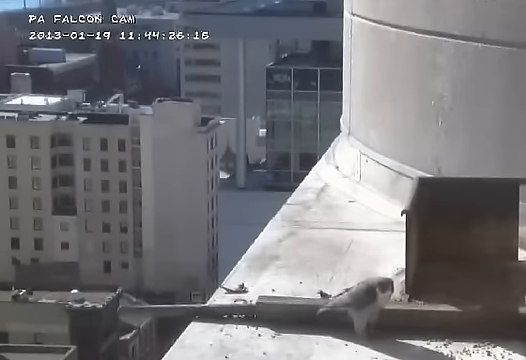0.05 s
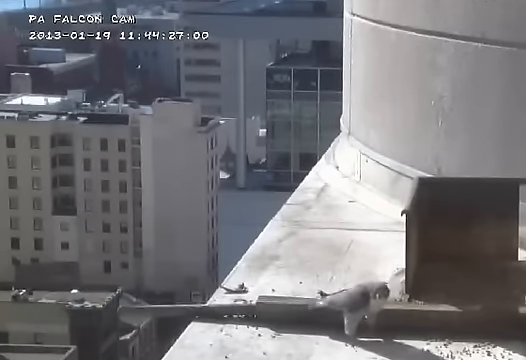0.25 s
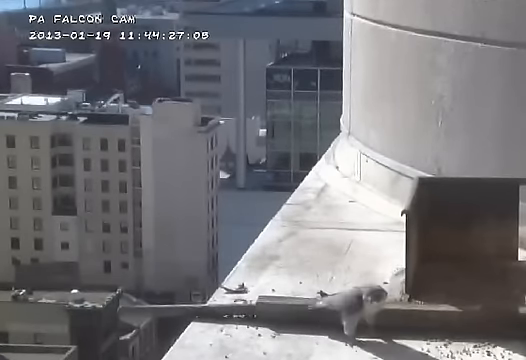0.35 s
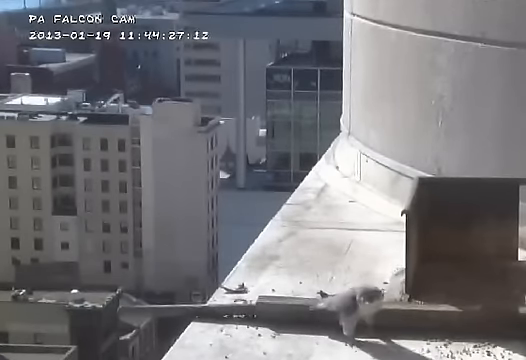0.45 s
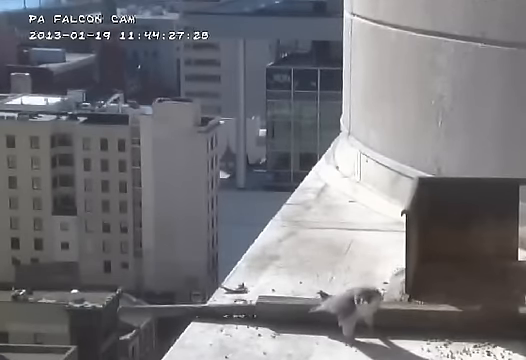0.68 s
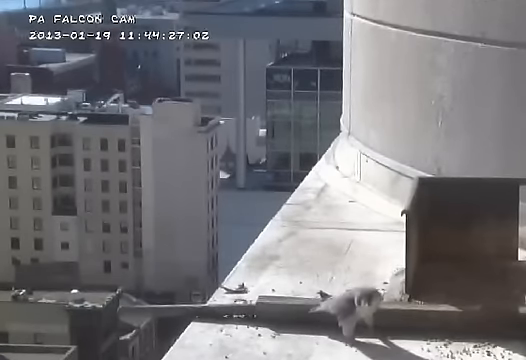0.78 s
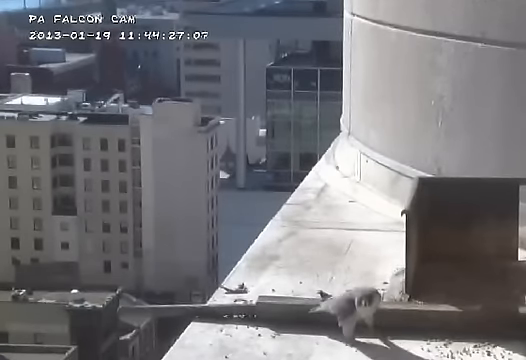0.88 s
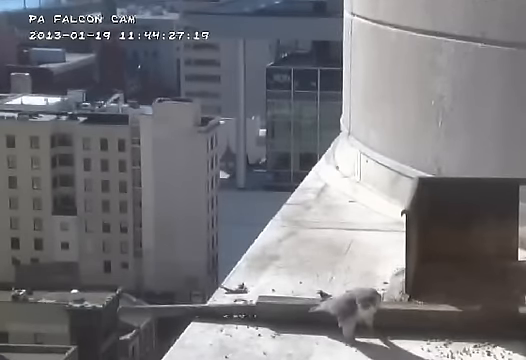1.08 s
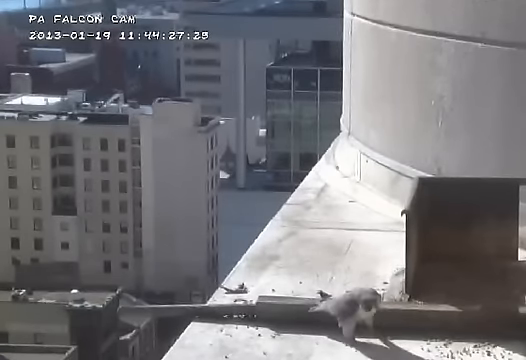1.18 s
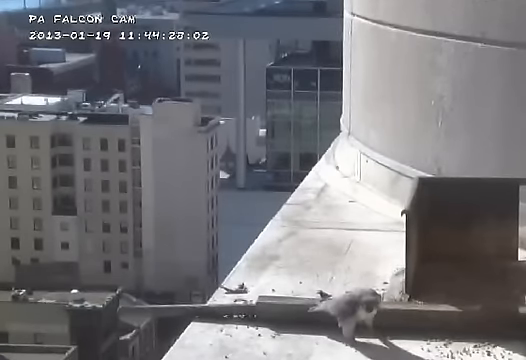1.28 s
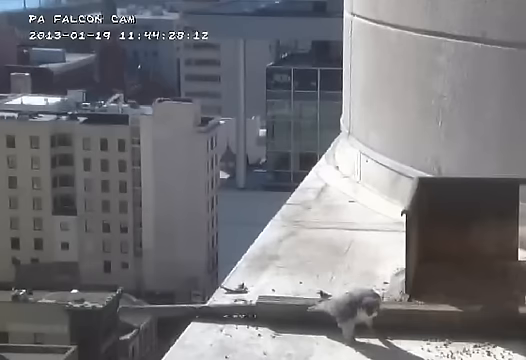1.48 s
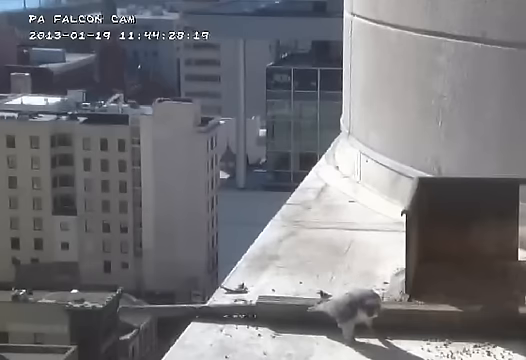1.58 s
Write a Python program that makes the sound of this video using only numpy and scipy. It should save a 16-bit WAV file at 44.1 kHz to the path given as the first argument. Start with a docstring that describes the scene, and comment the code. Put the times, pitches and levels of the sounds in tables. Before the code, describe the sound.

A falcon calls three times, close to the microphone on a high stone city ledge. Each short harsh call is a rising whistle breaking into a raspy chup. Faint traffic, ventilation hum and low wind lie underneath.

```python
"""A high stone ledge in the city, the microphone near a falcon that gives three harsh "ee-chup" calls.
Each is a thin lead-in, a rising whistle, then a break of the voice into a yelp and a bark,
ending in a rasp and a hollow chuff. The stonework close by throws the calls back;
distant traffic, ventilation hum and low wind lie underneath."""
import sys
import numpy as np
from scipy import signal
from scipy.fft import rfft, irfft
from scipy.io import wavfile

SR = 44100
rng = np.random.default_rng(int(sys.argv[2]) if len(sys.argv) > 2 else 0)


def file_out(sig):
    """Save sig as 16-bit WAV at sys.argv[1]."""
    # one column per channel
    cols = np.atleast_2d(sig).T
    # limit, then scale
    lim = np.clip(cols, -1, 1)
    pcm = np.round(lim * 32767).astype(np.int16)
    wavfile.write(sys.argv[1], SR, pcm)


N = 72765
TIME = np.arange(N) / SR
LEAD_HZ, LEAD_RISE_HZ = 1897.5, 186.6
WHISTLE_AHEAD_S = .062  # from the start of the full whistle to the break of the voice


def falcon():
    """Three calls, each timed around the break of the voice; returns the voiced and the rough parts."""
    # One row a call: break_s, lead_db, whistle_db, yelp_db, bark_db, rasp_db, chuff_db, whistle_hz,
    # bark_hz, bark_length_s, rasp_delay_s, chuff_delay_s, hoarse_db, rasp_hiss_db,
    # bark_fundamental_db, bark_third_harmonic_db
    calls = [ (0.309, -25.5, -22.5, -11, -15, -24, -35.5, 3325, 1883, .009, 0.015, 0.03, -22.5, -3, -20, -17),
             (0.7318, -28, -28.5, -16, -20, -26, -37, 3320, 1854, 0.022, 0.014, 0.033, -26, -8.5, -11, -14.5),
             (1.325, -29, -26, -14, -15.5, -23.5, -34.5, 3366, 1960, 0.0027, 0.012, 0.027, -35, 0.5, -13, -15.5)]
    # Colour of the hiss as the beak opens: frequency_hz, level_db
    hiss_colour = [(3000, -40), (3300, -7.5), (4050, 2), (4350, -20), (4680, -7), (4950, -18), (5400, -1),
                   (5850, -3.5), (6250, -24.5), (6750, -8.5), (7400, -16), (8000, -4)]
    voiced, rough = squeaks(), np.zeros(N)
    hiss = noise(hiss_colour)
    for (break_s, lead_db, whistle_db, yelp_db, bark_db, rasp_db, chuff_db, whistle_hz, bark_hz,
         bark_length_s, rasp_delay_s, chuff_delay_s, hoarse_db, hiss_db, first_db, third_db) in calls:
        voiced += from_db(lead_db) * lead_in(break_s)
        voiced += from_db(whistle_db) * whistle(break_s, whistle_hz)
        voiced += from_db(hoarse_db) * hoarseness(break_s)
        voiced += from_db(yelp_db) * yelp(break_s)
        voiced += from_db(bark_db) * bark(break_s, bark_hz, bark_length_s, first_db, third_db)
        rough += beak_hiss(break_s, hiss)
        rough += from_db(rasp_db) * rasp(break_s + rasp_delay_s, bark_hz, hiss_db)
        rough += from_db(chuff_db) * chuff(break_s + chuff_delay_s)
    return voiced, rough


def syrinx(pitch_hz, partials_db, jitter, shimmer_db, flutter_hz):
    """The bird's voice organ: a harmonic tone whose pitch and strength flutter."""
    fluttering_hz = pitch_hz * (1 + jitter * drift(flutter_hz))
    phase = 2 * np.pi * np.cumsum(fluttering_hz) / SR
    tone = sum(from_db(db) * np.sin(k * phase) for k, db in enumerate(partials_db, 1))
    return np.sqrt(2) * tone * from_db(shimmer_db * drift(flutter_hz))


def lead_in(break_s):
    """A thin low-register note flicks upward; its fundamental lingers as a croak under the whistle."""
    # Harmonics, fundamental first: level_db
    partials_db = [-15.5, -6, -24.5, -30.5]
    start_s, length_s = break_s - .086, .021
    pitch_hz = LEAD_HZ + LEAD_RISE_HZ * progress(start_s, length_s) ** 2
    note = syrinx(pitch_hz, partials_db, jitter=.008, shimmer_db=2, flutter_hz=300)
    note *= envelope(start_s, hold_s=.6 * length_s, rise_db_per_s=1500, fall_db_per_s=1096.5)
    croak_start_s = break_s - WHISTLE_AHEAD_S - length_s / 2
    croak = syrinx(pitch_hz - 50, [0], jitter=.035, shimmer_db=2, flutter_hz=300)
    croak *= envelope(croak_start_s, hold_s=.7 * length_s, rise_db_per_s=1496, fall_db_per_s=700)
    onset = progress(break_s - .111, length_s=.0046)
    return (note + from_db(-19) * croak) * onset


def whistle(break_s, pitch_hz):
    """A clean note starts faintly, then climbs and swells as its octave fades."""
    start_s, length_s, swell_db = break_s - WHISTLE_AHEAD_S, .058, 1
    effort = progress(start_s, length_s)
    rising_hz = pitch_hz + 331 * effort ** 1.7
    octave_db = -7 - 11.5 * effort ** 4 + 2 * drift(160)
    tone = syrinx(rising_hz, [0, octave_db], jitter=.004, shimmer_db=1, flutter_hz=140)
    early = envelope(start_s - .02, hold_s=.02, rise_db_per_s=1995, fall_db_per_s=2000)
    full = envelope(start_s, hold_s=length_s - .008, rise_db_per_s=3601, fall_db_per_s=1001)
    tone *= np.maximum(from_db(-18) * early, from_db(swell_db * effort) * full)
    # Where whistle and lead-in overlap, their sum tone sounds.
    sum_hz = pitch_hz + LEAD_HZ + LEAD_RISE_HZ
    sum_tone = syrinx(sum_hz, [0], jitter=.004, shimmer_db=1.5, flutter_hz=200)
    sum_tone *= envelope(start_s, hold_s=.0023, rise_db_per_s=1804.5, fall_db_per_s=1100.5)
    return tone + from_db(-15) * sum_tone


def hoarseness(break_s):
    """A rough lower voice sets in under the whistle and beats with it just before the break."""
    # Harmonics, fundamental first: level_db
    partials_db = [-5.5, -11]
    ahead_s = .016
    tone = syrinx(3050, partials_db, jitter=.019, shimmer_db=2, flutter_hz=320)
    return tone * envelope(break_s - ahead_s, .79 * ahead_s, rise_db_per_s=2600.5, fall_db_per_s=1799)


def yelp(break_s):
    """The voice breaks downward in a brief loud burst."""
    # Harmonics, fundamental first: level_db
    partials_db = [-1.5, -12]
    start_s, length_s = break_s - .001, .0033
    pitch_hz = 3181 - 110 * progress(start_s, length_s)
    tone = syrinx(pitch_hz, partials_db, jitter=.011, shimmer_db=.5, flutter_hz=597)
    return tone * envelope(start_s, length_s, rise_db_per_s=2598, fall_db_per_s=3399.5)


def bark(break_s, pitch_hz, length_s, first_db, third_db):
    """The voice falls back to the low register, its second harmonic ringing in the throat."""
    tone = syrinx(pitch_hz, [first_db, 0, third_db, -28], jitter=.0098, shimmer_db=.2, flutter_hz=580)
    return tone * envelope(break_s + .007, hold_s=.6 * length_s, rise_db_per_s=4003, fall_db_per_s=1901)


def rasp(centre_s, bark_hz, hiss_db):
    """The vibration turns chaotic: unsteady partials at quarters of the bark pitch, mixed with hiss."""
    # Throat colour of both partials and hiss: frequency_hz, level_db
    throat = [(1400, -32.5), (1700, -21.5), (1900, -5.5), (2250, -9), (2700, -3), (3100, -6), (3800, 2.5),
              (4500, -12), (5300, -12), (6200, -14), (7200, -17), (8200, -20.5)]
    throat_hz, throat_db = np.transpose(throat)
    line_width_hz, hold_s = 48, .0099
    partials = np.zeros(N)
    for hz in bark_hz * np.arange(3, 18) / 4:
        gain = from_db(np.interp(np.log(hz), np.log(throat_hz), throat_db))
        wobble = drift(line_width_hz) + 1j * drift(line_width_hz)
        wobble /= np.sqrt(abs(wobble))  # narrows the swings in strength, leaves the phase wandering
        partials += gain * np.real(wobble * np.exp(2j * np.pi * hz * TIME))
    sound = rms_one(partials) + from_db(hiss_db) * noise(throat)
    sound *= from_db(1.6 * drift(240))
    return sound * envelope(centre_s - hold_s / 2, hold_s, rise_db_per_s=797, fall_db_per_s=527.5)


def squeaks():
    """Brief near-pure tones, as when the rasp locks onto one partial."""
    # One row a squeak: start_s, pitch_hz, level_db, hold_s
    notes = [(0.323, 2980, -20.5, 0.0047), (0.334, 3040, -23, 0.0034), (0.29, 6800, -30, .007),
             (0.355, 2950, -36, 0.0077), (0.741, 5590, -31, 0.0098), (0.748, 6000, -32, .005),
             (0.773, 3200, -39, 0.0039), (0.772, 1850, -38, .006), (0.812, 1840, -46.5, .018),
             (1.335, 2770, -28.5, 0.004), (1.343, 5300, -32, 0.0036), (1.349, 3100, -23.5, 0.0071),
             (1.347, 1000, -40.5, 0.0019), (1.375, 1985, -34.5, 0.0022)]
    sound = np.zeros(N)
    for start_s, pitch_hz, level_db, hold_s in notes:
        tone = from_db(level_db) * syrinx(pitch_hz, [0], jitter=.005, shimmer_db=1.9, flutter_hz=400)
        sound += tone * envelope(start_s, hold_s, rise_db_per_s=3502.5, fall_db_per_s=1901)
    return sound


def chuff(centre_s):
    """A hollow puff closes the call, a rough low tone sinking through it."""
    # Throat colour of the puff: frequency_hz, level_db
    throat = [(150, -19.5), (280, -3), (520, -4), (700, -6), (950, 1.5), (1400, -14.5), (2000, -14.5),
              (4000, -45)]
    top_hz, end_hz, fall_s = 600, 241.4, .034
    pitch_hz = top_hz * (end_hz / top_hz) ** progress(centre_s - fall_s / 2, fall_s)
    tone = syrinx(pitch_hz, [0], jitter=.08, shimmer_db=1, flutter_hz=204.4)
    tone *= envelope(centre_s - .008, hold_s=.018, rise_db_per_s=1200.5, fall_db_per_s=700)
    puff = noise(throat) * envelope(centre_s - .008, hold_s=.01, rise_db_per_s=1101, fall_db_per_s=602)
    return puff + from_db(-8.5) * tone


def beak_hiss(break_s, hiss):
    """A faint hiss swells as the beak opens."""
    start_s, length_s = break_s - .099, .051
    level_db = -54.5 + 13 * progress(start_s, length_s)
    return from_db(level_db) * hiss * envelope(start_s, length_s, rise_db_per_s=3504, fall_db_per_s=650)


def ledge(calls):
    """Close echoes off the stone, a short ring of the alcove and a faint tail from buildings beyond."""
    # Reflections from the ledge and the walls: delay_s, level_db
    reflections = [(.0095, -18.5), (0.0134, -17.5), (0.0223, -17.5)]
    echoes = sum(from_db(db) * np.interp(TIME - delay_s, TIME, calls, left=0)
                 for delay_s, db in reflections)
    alcove, buildings = (.31, -20.5), (.8, -37)
    build_up = progress(start_s=.006, length_s=.012)
    response = np.zeros(N)
    for t60_s, level_db in (alcove, buildings):
        tail = rng.standard_normal(N) * from_db(-60 * TIME / t60_s) * build_up
        response += from_db(level_db) * rms_one(tail) / np.sqrt(N)
    return echoes + signal.fftconvolve(calls, response)[:N]


def ventilation():
    """Ventilation hums in a few low tones that waver in pitch and level."""
    # Hum tones: pitch_hz, level_db, wander_hz
    tones = [(49.1, -44.5, 2), (93.3, -59, 1.5), (153.3, -55.5, 7.4), (188, -50.5, 6.2), (298.7, -63, 7.7)]
    hum = np.zeros(N)
    for pitch_hz, level_db, wander_hz in tones:
        gain = from_db(level_db + .69 * drift(5))
        phase = 2 * np.pi * np.cumsum(pitch_hz + wander_hz * drift(12)) / SR
        hum += gain * np.sqrt(2) * np.sin(phase)
    return hum


def traffic_and_wind():
    """Distant traffic and low wind merge into a steady rumble."""
    # Colour of the rumble: frequency_hz, level_db
    rumble_colour = [(15, -16.5), (28, 1), (45, 0.5), (65, -3), (80, -5), (140, -4), (195, -6.5),
                     (225, -13.5), (310, -13), (400, -16), (750, -20), (1150, -21.5), (1600, -28.5),
                     (2500, -33.5), (4000, -47.5), (8000, -55)]
    return from_db(-44) * noise(rumble_colour)


def from_db(db):
    """Decibels to gain."""
    return 10 ** (np.asarray(db) / 20)


def rms_one(x):
    """Scale to unit rms."""
    return x / np.sqrt(np.mean(x ** 2) + 1e-20)


def drift(rate_hz):
    """Smooth random wander with a spread of about 1."""
    hz = np.arange(N + 1) * SR / (2 * N)
    spectrum = rfft(rng.standard_normal(2 * N)) / (1 + (hz / rate_hz) ** 2)
    return rms_one(irfft(spectrum))[:N]


def noise(colour):
    """Noise at unit rms, shaped by rows of frequency_hz, level_db."""
    hz, db = np.transpose(colour)
    bins_hz = np.maximum(np.arange(N // 2 + 1) * SR / N, 1)
    gain = from_db(np.interp(np.log(bins_hz), np.log(hz), db, left=-90, right=-90))
    return rms_one(irfft(rfft(rng.standard_normal(N)) * gain, N))


def envelope(start_s, hold_s, rise_db_per_s, fall_db_per_s):
    """Exponential rise to full level at start_s, a hold, then an exponential fall."""
    rise_db = -rise_db_per_s * np.maximum(start_s - TIME, 0)
    fall_db = -fall_db_per_s * np.maximum(TIME - start_s - hold_s, 0)
    return from_db(np.maximum(rise_db + fall_db, -200))


def progress(start_s, length_s):
    """A straight ramp from 0 to 1."""
    return np.clip((TIME - start_s) / length_s, 0, 1)


def scene():
    """The bird in front, its echoes behind it and the city underneath, in mono."""
    voiced, rough = falcon()
    echoes = ledge(voiced + from_db(-2) * rough)
    return (voiced + rough + echoes + ventilation() + traffic_and_wind())[None]


def record(dry):
    """The sound fades in and out over a few milliseconds; the microphone cuts the top steeply."""
    fade_s, cutoff_hz = .004, 8200
    fade = np.clip(np.minimum(TIME, TIME[::-1]) / fade_s, 0, 1)
    microphone = signal.ellip(12, .2, 70, cutoff_hz, fs=SR, output="sos")
    return signal.sosfilt(microphone, dry * fade)


dry = scene()
out = record(dry)
file_out(out)
```